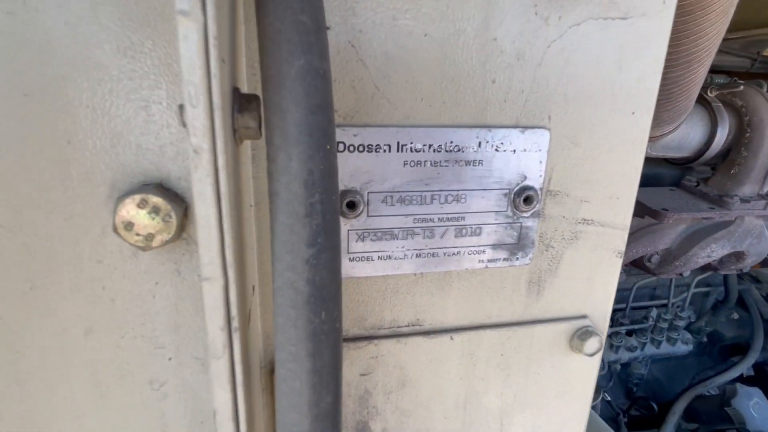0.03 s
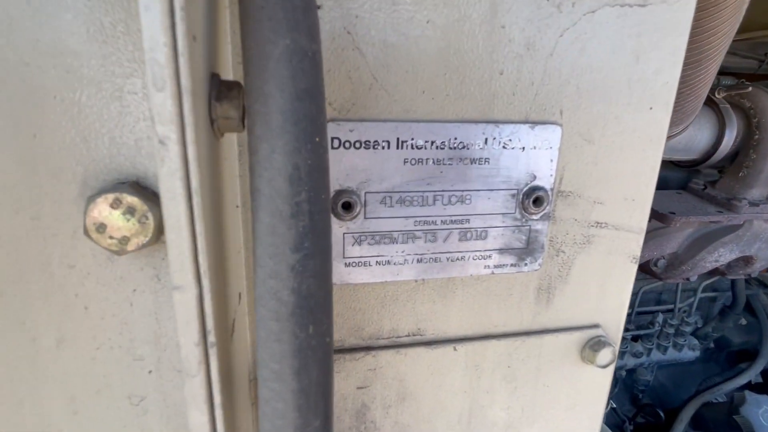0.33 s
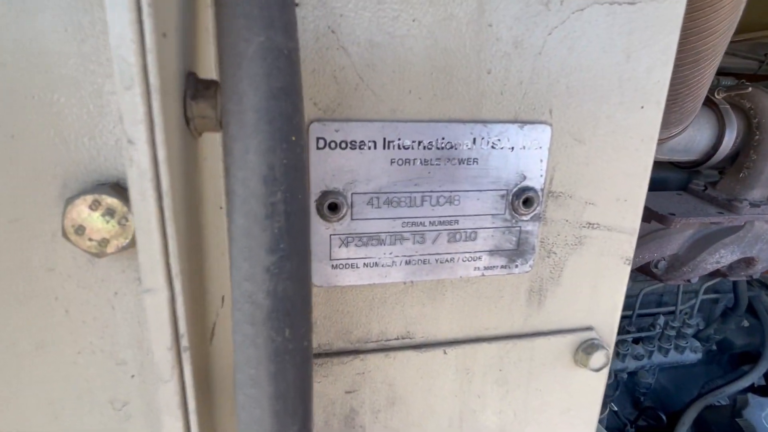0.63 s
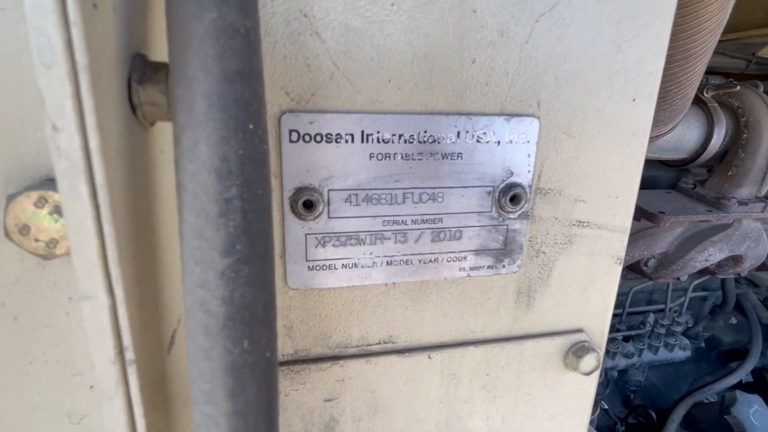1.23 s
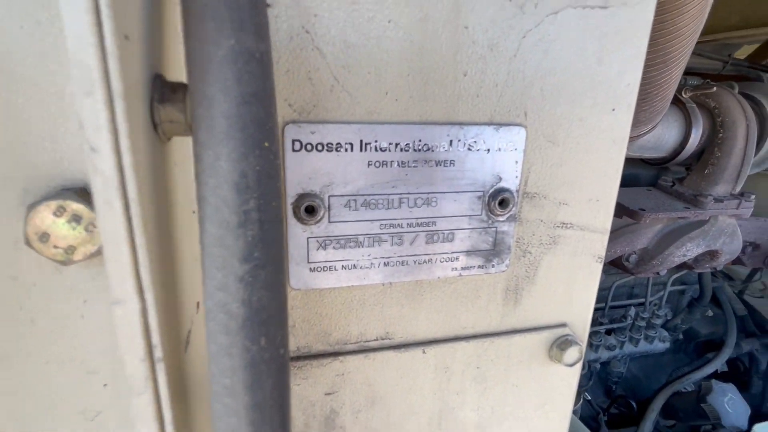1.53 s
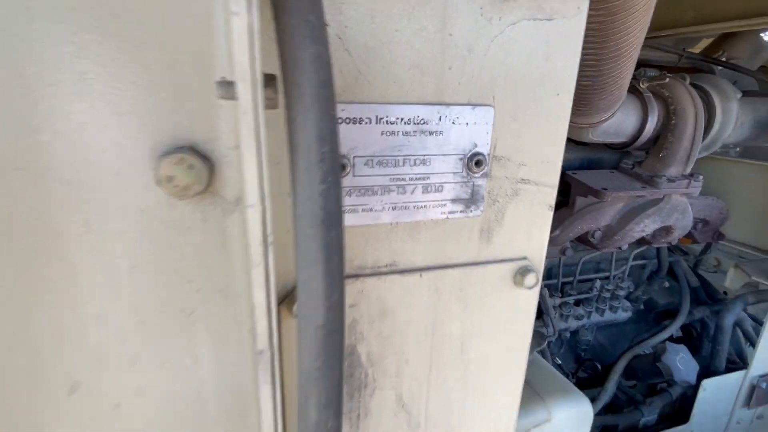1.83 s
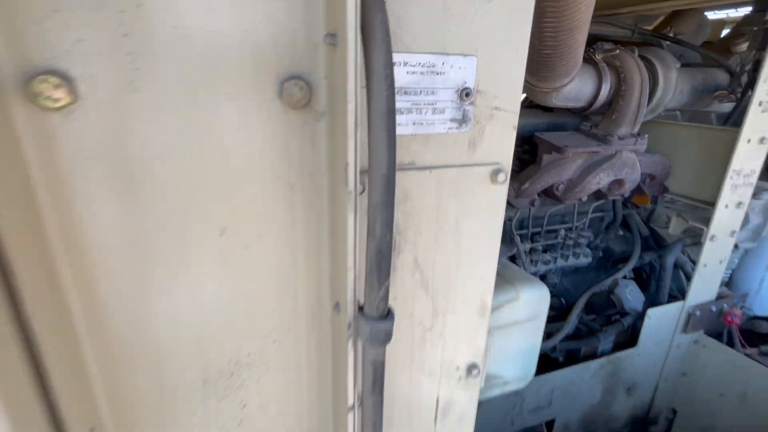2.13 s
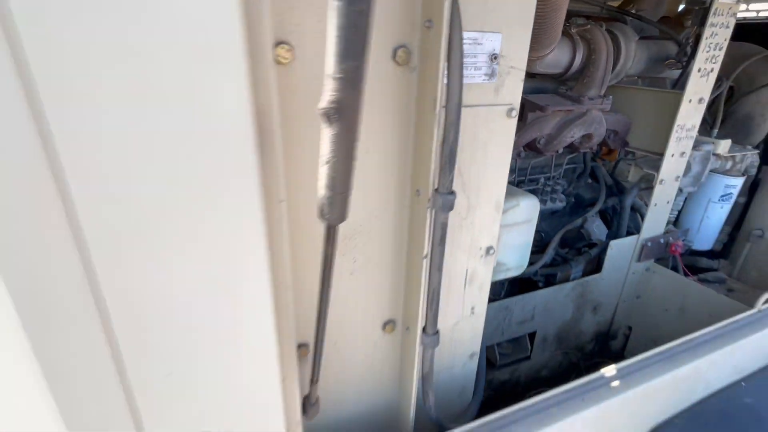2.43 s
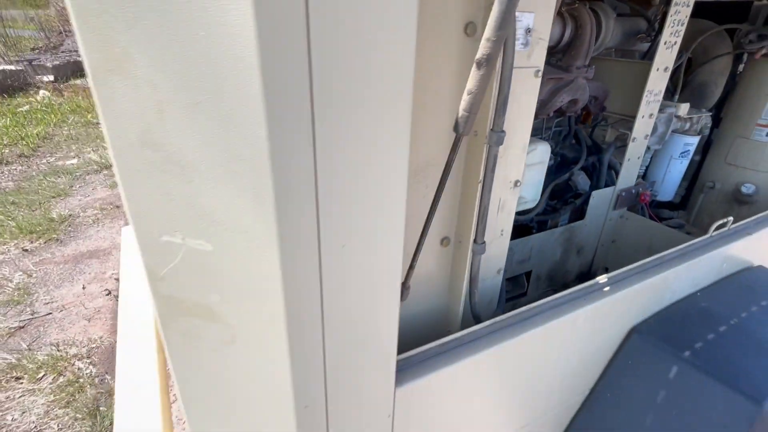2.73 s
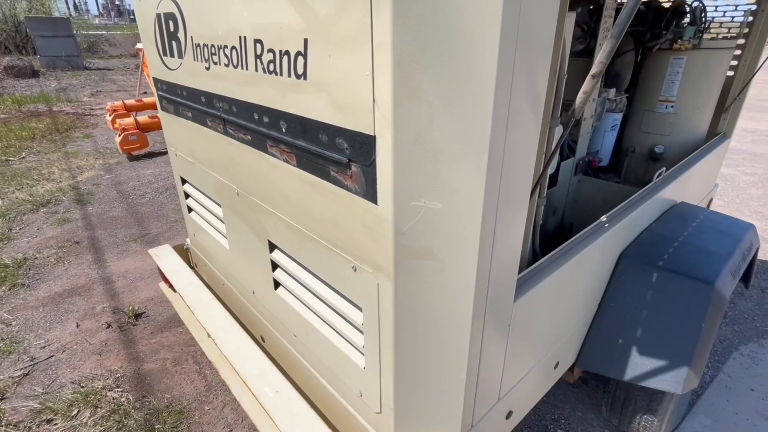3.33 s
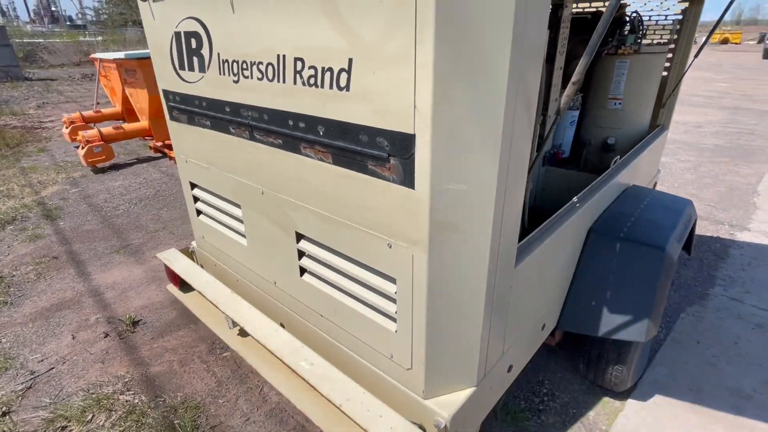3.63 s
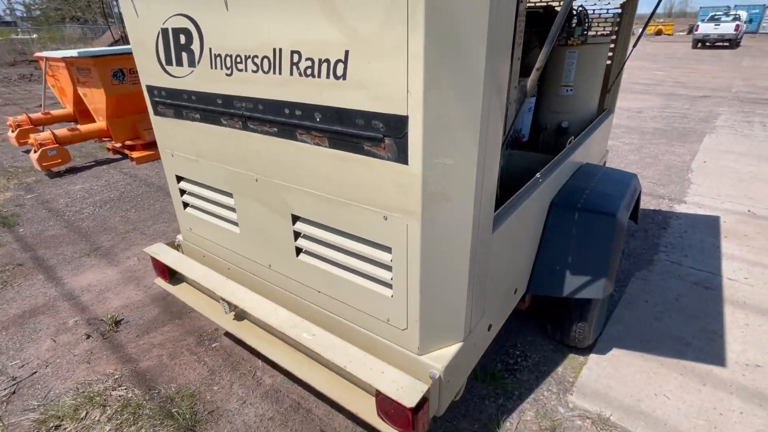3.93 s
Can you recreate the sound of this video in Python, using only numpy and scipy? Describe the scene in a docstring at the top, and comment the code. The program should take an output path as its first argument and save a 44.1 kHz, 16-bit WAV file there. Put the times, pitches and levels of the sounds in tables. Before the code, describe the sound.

A towable diesel air compressor runs outdoors at constant speed, heard close at its open side door: a low drone with rapid clatter and ticking, fan hum, gear whine and air hiss. From about 2 seconds the microphone backs around the housing's corner, and the sound grows quieter and duller while the drone continues. Just before 4 seconds, a brief puff of wind rumbles on the microphone.

```python
"""Diesel air compressor, outdoors

A towable compressor runs at a steady speed, the microphone at its open side door. Four cylinders
drone, clatter and tick in a pattern that partly repeats every cycle; gears whine, fan and compressor
hum, air hisses. After two seconds the microphone backs away round the corner of the housing, which
shades the clatter, and at the very end a puff of wind touches it."""
import sys
import numpy as np
from scipy import signal
from scipy.fft import irfft
from scipy.io import wavfile
from scipy.ndimage import uniform_filter1d

SR = 44100
rng = np.random.default_rng(int(sys.argv[2]) if len(sys.argv) > 2 else 0)


def persist_wave(psi):
    """Save psi, clipped to +-1, as 16-bit WAV."""
    counts = np.round(np.clip(psi, -1, 1) * 32767).astype(np.int16)
    wavfile.write(sys.argv[1], SR, np.atleast_2d(counts).T)


N = 176400
TIME = np.arange(N) / SR
FIRING_HZ, CYLINDERS = 51.5, 4
FIRING_LEAD = .17  # share of one firing period
FLICKER_DB = .5  # of every tone


def undb(db):
    """Decibels to gain."""
    return 10 ** (np.asarray(db) / 20)


def curve(points, t=TIME):
    """A (time, value) table read at times t."""
    return np.interp(t, *np.array(points).T)


def spectrum(points, hz, column=1):
    """One column of a table read over log frequency."""
    table = np.array(points)
    return np.interp(np.log(hz + 1), np.log(table[:, 0]), table[:, column])


def wander(rate_hz):
    """Smooth random drift with a spread of 1."""
    hold = int(SR / rate_hz)
    steps = np.repeat(rng.standard_normal(N // hold + 1), hold)
    drift = uniform_filter1d(uniform_filter1d(steps, hold), hold)[:N]
    return (drift - drift.mean()) / drift.std()


# The microphone's walk round the housing (time [s], distance [0 at the door, 1 behind the corner])
MIC_PATH = [(0, 0.019), (.5, 0), (1.35, 0.045), (1.75, 0.098), (2.1, 0.25), (2.27, 0.45), (2.55, 0.89),
            (2.95, 1.01), (3.4, 1.17), (4, 1.07)]
def mic_distance(t=TIME):
    """How far the microphone has backed away from the door."""
    return curve(MIC_PATH, t)


def stereo_sine(angle, level_db, pan_db, lead):
    """A sine at the microphone, its left side pan_db stronger and lead radians ahead."""
    pan = undb(pan_db)
    return 2 * undb(level_db) / np.sqrt(1 + pan ** 2) * np.array([pan * np.sin(angle + lead), np.sin(angle)])


def tone(turns, door_db, corner_db, pan_db, lead=0):
    """A flickering tone whose level follows the microphone from door to corner."""
    level_db = door_db + (corner_db - door_db) * mic_distance() + FLICKER_DB * wander(11)
    return stereo_sine(2 * np.pi * (turns + rng.random()), level_db, pan_db, lead)


# Likeness of left and right (frequency [Hz], correlation at the door, correlation behind the corner)
MIC_CORRELATION = [(60, .97, 0.37), (110, .95, 0.97), (252, 0.8, 0.24), (384, 0.54, 0.58),
                   (520, 0.39, 0.63), (810, 0.22, 0.46), (1000, 0.81, 0.19), (1470, -0.68, 0.87),
                   (1650, 1, 0.39), (2050, 0.61, -0.26), (2980, 0.17, -0.88), (3270, 0.033, -0.55),
                   (4600, 0.55, 0.6), (5280, -0.51, -0.62), (6100, -0.074, -0.62), (6440, 0.25, 0.49),
                   (7600, 0.58, 0.34), (7830, -0.42, -0.44), (9800, -0.37, -0.51), (10700, -0.35, -0.47),
                   (13330, 1, 1)]
# Lean of the noise across the microphone (frequency [Hz], left minus right [dB])
MIC_BALANCE = [(60, -3), (120, -2), (220, -5.5), (380, -1.5), (700, -5), (1300, -4), (2400, -3), (3300, -1),
               (5000, 0.7), (6300, 4), (7800, -4), (8300, 2), (9400, -18.5), (10300, 2), (11500, 0.5),
               (16000, 0)]
def radiate(noise_pair, colour):
    """Colours two white noises by colour(hz, t) in dB/Hz and spreads them over left and right."""
    frames = dict(fs=SR, nperseg=2048, noverlap=1536)
    hz, t, (mid, side) = signal.stft(noise_pair / noise_pair.std(), **frames)
    hz = hz[:, None]
    far = np.clip(mic_distance(t), 0, 1)
    alike = (1 - far) * spectrum(MIC_CORRELATION, hz) + far * spectrum(MIC_CORRELATION, hz, column=2)
    alike = np.clip(alike, -1, 1)
    mid, side = mid * np.sqrt((1 + alike) / 2), side * np.sqrt((1 - alike) / 2)
    pan = undb(spectrum(MIC_BALANCE, hz))
    stereo = np.array([(mid + side) * pan, mid - side]) * np.sqrt(SR / (1 + pan ** 2))
    return signal.istft(stereo * undb(colour(hz, t)), **frames)[1][:, :N]


# Engine and gear tones (multiple of the firing rate, level at the door [dB],
# level behind the corner [dB], left minus right [dB], left lead [rad])
ENGINE_TONES = [(1, -25.8, -30, -4.3, .05), (1.25, -40, -36.5, -8.5, 2.2), (2, -27, -35, -5.6, .02),
                (3, -46, -35, -10, -1), (4, -35.5, -41, 1, 0.2), (4.25, -31.5, -50, -11, -0.6),
                (7, -38.5, -54, 6, 0.64), (9, -39, -45, 1, -1.8), (11, -40, -54, 6, -3),
                (14.25, -43.5, -63, 5, 2.8), (17, -43.5, -57, -2, 1.6), (20, -43.5, -57, -7, 2.5),
                (21, -46, -64, -2, 1), (24.25, -47, -56, -3, -1), (26.25, -48, -60, -5, 1.5),
                (31.25, -47, -59, -6.5, 1), (35, -48, -56, -8, -1), (37, -47, -67, -6, -0.5),
                (38.25, -46, -68, -9, 1)]
def engine_drone(firings):
    """Tones locked to the cycle; higher ones wax and wane as the microphone crosses standing waves."""
    drone = 0
    for multiple, *at_mic in ENGINE_TONES:
        octaves_up = np.log2(max(multiple / 2, 1))
        fading_db = 1.1 * octaves_up * wander(3)
        drone = drone + tone(firings * multiple, *at_mic) * undb(fading_db)
    return drone


# Gear whine along the microphone's walk (time [s], level [dB])
WHINE_LEVEL = [(0, -34), (.7, -31), (1.3, -33), (1.9, -33), (2.4, -37), (2.8, -34), (3.3, -37.5),
               (3.7, -44), (4, -50)]
# Its phase across the microphone (time [s], left lead [rad])
WHINE_LEAD = [(0, -3.5), (1.8, -2), (2.8, -1.5), (4, 4.5)]
def gear_whine(firings):
    """Gears sing at ten times the firing rate; this carries round the corner, moves right and fades."""
    angle = 2 * np.pi * (10 * firings + rng.random())
    level_db = curve(WHINE_LEVEL) + FLICKER_DB * wander(21)
    return stereo_sine(angle, level_db, pan_db=-8 * mic_distance(), lead=curve(WHINE_LEAD))


def rotor_turns(hz, waver_rad):
    """Cycles completed by a hum whose phase wavers."""
    return hz * TIME + waver_rad * wander(3.7) / (2 * np.pi)


# Fan hum, strongest near the door (time [s], level [dB])
FAN_LEVEL = [(0, -20), (.7, -20.5), (1.7, -20.5), (2.15, -23.5), (2.55, -27), (2.9, -35.5), (3.4, -50),
             (4, -37)]
def fan_hum():
    """The fan hums at its own speed, to the right of the microphone."""
    return tone(rotor_turns(hz=132, waver_rad=.15), 0, 0, pan_db=-8.5) * undb(curve(FAN_LEVEL))


def compressor_hum():
    """The compressor's rotor hums at its own speed and beats against the engine."""
    return tone(rotor_turns(hz=179.6, waver_rad=.43), door_db=-25.5, corner_db=-29.5, pan_db=-4)


# Shadow of the housing, from behind the corner (frequency [Hz], gain [dB])
HOUSING_SHADOW = [(55, -5), (100, -2), (130, -7), (165, -4), (270, -5), (360, -8.5), (550, -6), (800, -7.5),
                  (1050, -9), (1350, -11), (1950, -17), (2800, -7.5), (4000, -5.5)]
# Clatter near 1.7 kHz brightens briefly, then stays lifted behind the corner (time [s], gain [dB])
CLATTER_LIFT = [(1.95, -1.5), (2.14, 4.5), (2.25, 0), (2.45, 4.5), (2.65, 4.5)]
def housing_db(hz, t, lift_hz=1700, lift_octaves=.47):
    """The housing shades the engine noise as the microphone backs away; one band is lifted against it."""
    band = np.exp(-(np.log2((hz + 1) / lift_hz) / lift_octaves) ** 2)
    return spectrum(HOUSING_SHADOW, hz) * mic_distance(t) + band * curve(CLATTER_LIFT, t)


# Exhaust and panels, from the door (frequency [Hz], level [dB/Hz])
RUMBLE_SPECTRUM = [(20, -86), (36, -80), (58, -45), (82, -57.5), (125, -45.5), (165, -49), (270, -53),
                   (400, -53.5), (650, -58), (1500, -99)]
def exhaust_rumble():
    """Exhaust and panels rumble irregularly under the drone."""
    noise = rng.standard_normal((2, N))
    return radiate(noise, lambda hz, t: spectrum(RUMBLE_SPECTRUM, hz) + housing_db(hz, t))


def impact_noise(firings, repeat_share=.55, pattern_life_s=1.2):
    """Valve and gear impacts: part is new, part repeats each cycle, shifting with time and position."""
    size = int(SR * CYLINDERS / FIRING_HZ)
    place = (firings / CYLINDERS % 1 * size).astype(int) % size
    age = TIME / pattern_life_s + 4 * np.clip(mic_distance(), 0, 1)  # the walk crosses four more patterns
    repeating = 0
    for k in range(10):
        pattern = irfft(np.exp(2j * np.pi * rng.random((2, size // 2 + 1))), size) * np.sqrt(size)
        crossfade = np.cos(np.pi / 2 * np.clip(age - k, -1, 1))
        repeating = repeating + pattern[:, place] * crossfade
    return np.sqrt(repeat_share) * repeating + np.sqrt(1 - repeat_share) * rng.standard_normal((2, N))


def firing_strength(count, scatter_db=2.5):
    """No two firings are equally strong."""
    return undb(scatter_db * rng.standard_normal(N // 100))[count.astype(int)]


def firing_pulse(firings, rise=.12, decay=.17):
    """Swells at each firing and dies away; rise and decay are shares of a firing period."""
    count, phase = np.divmod(firings + FIRING_LEAD, 1)
    pulse = (1 - np.exp(-phase / rise)) * np.exp(-phase / decay)
    return pulse / pulse.max() * firing_strength(count)


# Block and housing, from the door (frequency [Hz], level [dB/Hz])
CLATTER_SPECTRUM = [(100, -61), (250, -62.5), (370, -55.5), (520, -57), (800, -58), (1080, -56),
                    (1300, -55), (1530, -57), (1800, -57), (2000, -57.5), (2300, -67), (3200, -70.5),
                    (5000, -87), (16000, -100)]
# Each cylinder's clatter, in firing order (gain [dB])
CYLINDER_DB = [.7, .5, -1.3, .2]
def diesel_clatter(firings):
    """Block and housing rattle harder at each firing, the four cylinders unequal."""
    cylinder_gain = undb(CYLINDER_DB)[(firings + FIRING_LEAD).astype(int) % CYLINDERS]
    impacts = impact_noise(firings) * cylinder_gain * (1 + .25 * firing_pulse(firings))
    return radiate(impacts, lambda hz, t: spectrum(CLATTER_SPECTRUM, hz) + housing_db(hz, t))


def engine_knock(firings, centre_hz=640, octaves=.56):
    """One duller knock in every engine cycle."""
    def colour(hz, t):
        return -53.5 - 10 * (np.log2((hz + 1) / centre_hz) / octaves) ** 2 + housing_db(hz, t)
    cycle_phase = firings / CYLINDERS % 1
    blow = np.exp(-.5 * ((cycle_phase - .69) / .055) ** 2)
    return radiate(impact_noise(firings) * blow, colour) * np.sqrt(np.mean(blow ** 2))


# Resonances of the injector pump and its steel pipes
# (frequency [Hz], width [Hz], level at the door [dB], level behind the corner [dB])
INJECTOR_MODES = [(1915, 280, -36, -62), (2445, 170, -45, -58), (3000, 550, -43.5, -57),
                  (3750, 1150, -42, -53.5), (4570, 320, -47.5, -68)]
def injector_ticks(firings):
    """A sharp tick at each firing rings briefly in the steel."""
    count, phase = np.divmod(firings + .05, 1)
    ticks = firing_strength(count) * impact_noise(firings) * np.exp(-phase / .17)
    ringing = 0
    for hz, width, door_db, corner_db in INJECTOR_MODES:
        band = signal.butter(2, [hz - width / 2, hz + width / 2], "band", fs=SR, output="sos")
        ring = signal.sosfilt(band, ticks)
        ringing = ringing + ring / ring.std() * undb(door_db + (corner_db - door_db) * mic_distance())
    return ringing


# Hiss as heard at the door, with a narrow notch near 5.5 kHz (frequency [Hz], level [dB/Hz])
HISS_SPECTRUM = [(1000, -92), (2400, -67.5), (3500, -66.5), (4600, -68), (5200, -66), (5550, -79),
                 (5900, -65), (7050, -66.5), (7300, -72), (7800, -67), (7980, -62.5), (9400, -60),
                 (10400, -66.5), (12200, -69), (14300, -65.5), (16000, -67)]
# Breathy whistles of the intake (frequency [Hz], width [Hz], level [dB/Hz])
INTAKE_WHISTLES = [(4526, 22, -57.5), (5980, 43, -63.5), (9000, 35, -63), (13300, 70, -63)]
# The hiss fades as the microphone backs away (time [s], gain [dB])
HISS_FADE = [(0, -1), (.5, -0.8), (1.3, -0.8), (2.1, -2), (2.7, -4), (3.25, -6.5), (4, -9.5)]
# Its extra loss behind the corner (frequency [Hz], gain [dB])
HISS_SHADOW = [(2200, -2.5), (3000, -11), (3900, -4), (4700, -14.5), (5500, -4), (6500, -1.5), (9000, -3.5),
               (12000, -0.5), (16000, -2.5)]
def air_hiss(firings):
    """Rushing air hisses and whistles faintly, throbbing at the firing rate."""
    def colour(hz, t):
        whistles = sum(undb(db) ** 2 / (1 + ((hz - centre) / width) ** 2) ** 2
                       for centre, width, db in INTAKE_WHISTLES)
        power = undb(spectrum(HISS_SPECTRUM, hz)) ** 2 + whistles
        return 10 * np.log10(power) + curve(HISS_FADE, t) + spectrum(HISS_SHADOW, hz) * mic_distance(t)
    return radiate(rng.standard_normal((2, N)) * (1 + .17 * firing_pulse(firings)), colour)


# Wind right on the microphone (frequency [Hz], level [dB/Hz])
WIND_SPECTRUM = [(20, -58), (60, -38), (150, -52), (320, -43.5), (480, -65), (1500, -89)]
# One gust, behind the corner (time [s], gain [dB])
GUST = [(3.75, -30), (3.88, -12), (3.95, -2.5), (4, -8)]
def wind_puff():
    """A puff of wind rumbles on the microphone."""
    noise = rng.standard_normal((2, N))
    return radiate(noise, lambda hz, t: spectrum(WIND_SPECTRUM, hz)) * undb(curve(GUST))


def scene():
    """The governed crankshaft times the engine's sounds; fan, compressor and wind run free of it."""
    speed = 1 + .001 * wander(1.488) + .0007 * wander(12)
    firings = np.cumsum(FIRING_HZ * speed) / SR
    rattle = diesel_clatter(firings) + engine_knock(firings) + injector_ticks(firings)
    rattle *= undb(.45 * wander(9))  # the level sways slightly
    tones = engine_drone(firings) + gear_whine(firings) + fan_hum() + compressor_hum()
    return tones + exhaust_rumble() + rattle + air_hiss(firings) + wind_puff()


def record(dry):
    """The recorder cuts the deepest bass and the top."""
    low_cut = signal.butter(4, 35, "high", fs=SR, output="sos")
    high_cut = signal.ellip(12, .1, 90, 15750, fs=SR, output="sos")
    return signal.sosfilt(high_cut, signal.sosfilt(low_cut, dry))


dry = scene()
out = record(dry)
persist_wave(out)
```